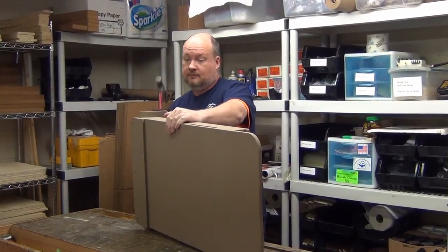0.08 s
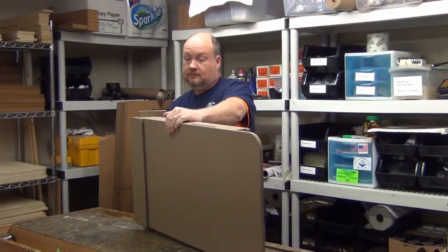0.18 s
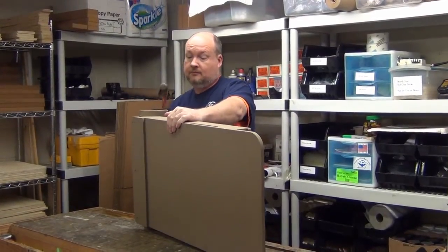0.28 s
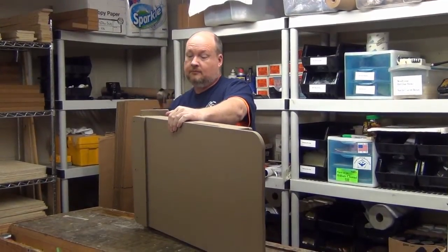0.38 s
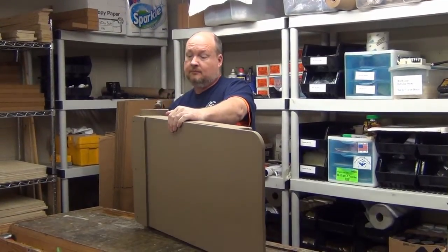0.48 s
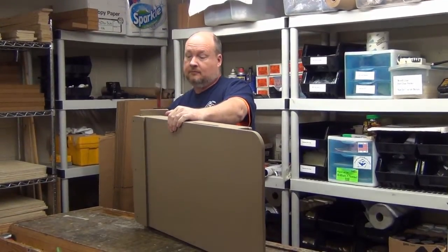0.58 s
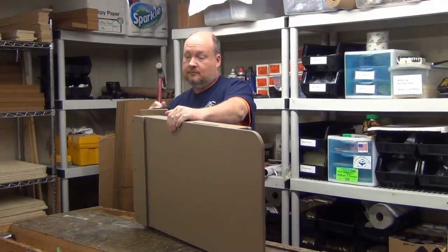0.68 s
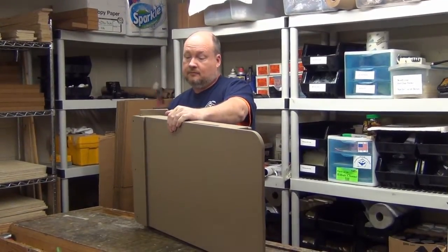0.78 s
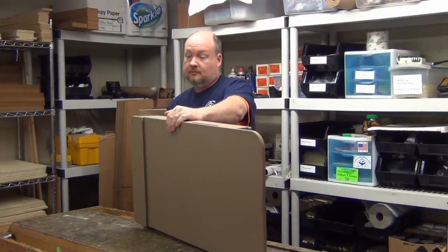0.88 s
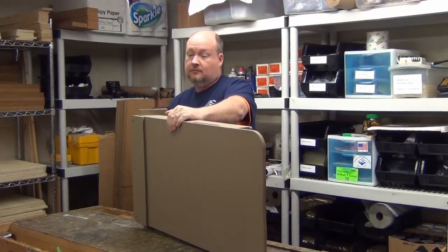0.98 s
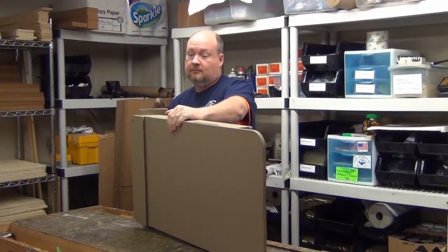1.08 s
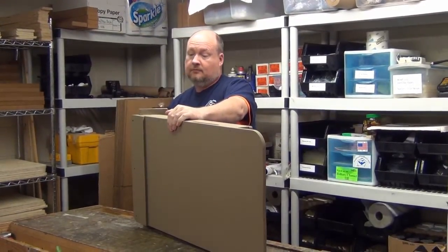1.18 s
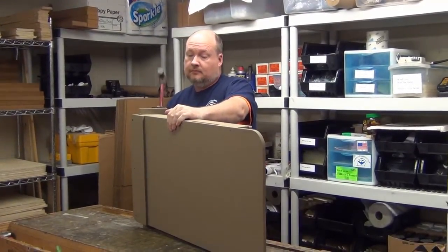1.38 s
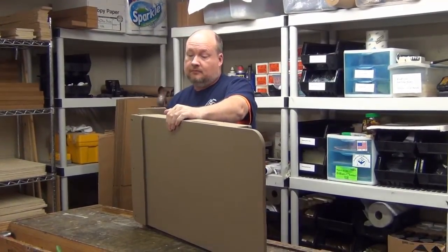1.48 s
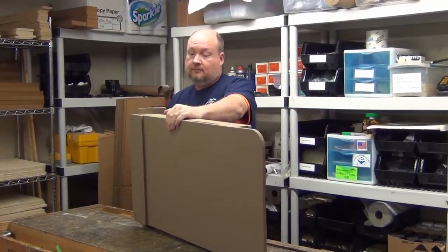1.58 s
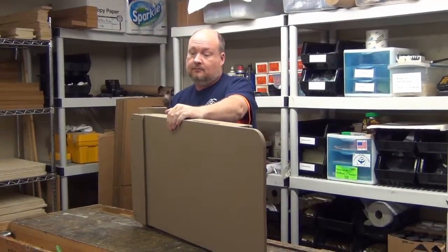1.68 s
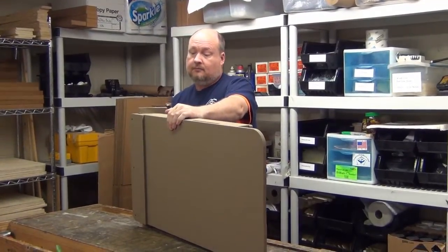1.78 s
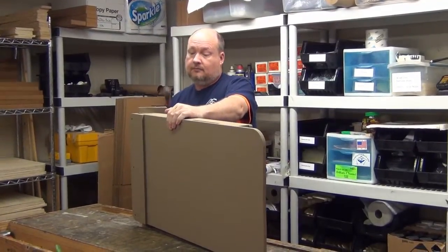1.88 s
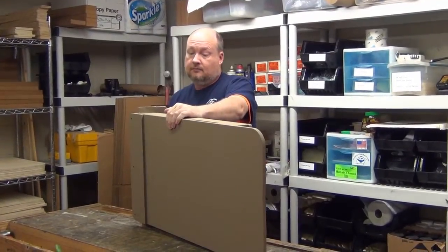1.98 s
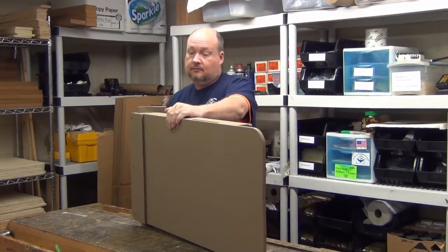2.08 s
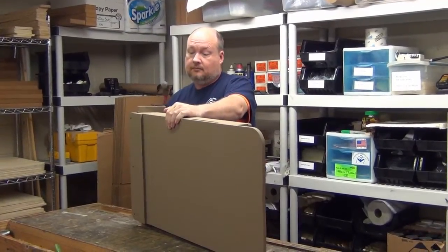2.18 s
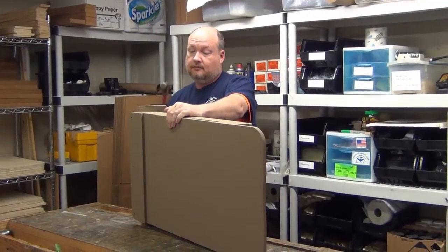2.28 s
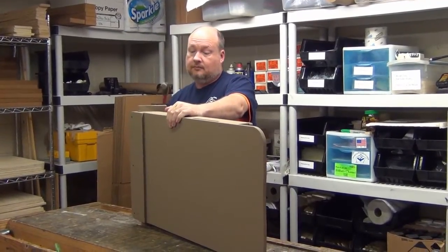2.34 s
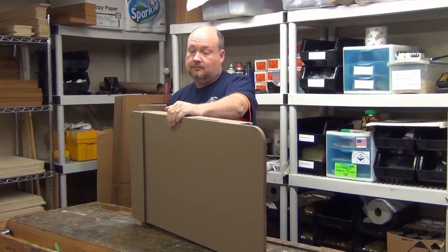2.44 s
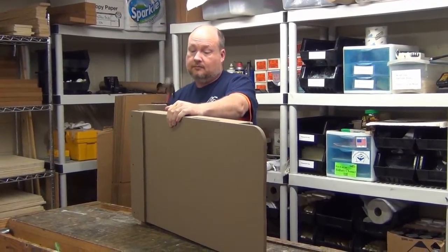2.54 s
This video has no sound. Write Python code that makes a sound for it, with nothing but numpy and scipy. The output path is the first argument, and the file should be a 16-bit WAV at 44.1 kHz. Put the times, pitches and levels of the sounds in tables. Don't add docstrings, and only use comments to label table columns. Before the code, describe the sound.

Hollow wooden box knocks, dull and boomy with a sharp contact crack, at about 0.23, 0.9, 1.54 and 2.17 seconds, the last softest. After each, a loose part hops with a small clatter, clearest near 0.5, 1.2 and 1.8. Short cluttered workshop reverberation, limiter-flattened booms, low room hum. Tiny dry ticks near the microphone; a faint lens motor buzz from 1.25 on.

```python
import sys
import numpy as np
from scipy import signal
from scipy.fft import rfft, irfft, next_fast_len
from scipy.io import wavfile
from scipy.ndimage import uniform_filter1d

SR = 44100
rng = np.random.default_rng(int(sys.argv[2]) if len(sys.argv) > 2 else 0)


def waveform_to_disk(signal):
    frames = np.transpose(np.atleast_2d(signal))
    scaled = np.clip(frames, -1, 1) * 32767
    samples = np.round(scaled).astype(np.int16)
    wavfile.write(sys.argv[1], SR, samples)


def linear_from_db(decibels):
    return 10 ** (np.asarray(decibels, float) / 20)


N = 112455

# (frequency [Hz], likeness [0-1])
BENCH_LIKENESS = [(60, 0.99), (180, 0.75), (550, 0.97), (1650, 0.95), (4970, 0.88), (15000, 0.6)]
AIR_LIKENESS = [(60, 0.64), (180, 0.89), (550, 0.88), (1650, 0.99), (4970, 0.97), (15000, 0.63)]

# (frequency [Hz], density [dB per Hz])
AIR_COLOUR = [(25, -38), (60, -4.5), (100, -17.5), (150, 1), (480, -11.5), (800, -15.5), (9900, -25),
              (16300, -36)]
# (frequency [Hz], width [Hz], level [dB])
HUMS = [(168.6, 12, -3), (250, 33, -5.5), (361.7, 42, -1.5), (478, 20, -10.5), (884, 43, -11),
        (1054, 64, -11.5), (1530, 24, -16.5)]
# (frequency [Hz], level [dB])
WHINE = [(15735, -74)]
AIR_DB, HUM_DB = -56.5, -57.5

# (time [s], frequency [Hz])
MOTOR_PITCH = [(1.25, 1592), (1.53, 1585), (1.85, 1552), (2.14, 1550), (2.5, 1550)]
MOTOR_HARMONICS = [-68, -64.5, -60]
MOTOR_ON_S, MOTOR_STEP_S = 1.2485, 0.013
STEPS_PER_S, STEPS = 29.97, 39

# (time [s], peak level [dB], frequency [Hz], echo level [dB])
TICKS = [(0.0024, -31, 9450, -23), (0.047, -42.5, 9100, -11.5), (0.1041, -38, 9650, -20),
         (0.5374, -33, 9070, -26), (0.5755, -39.5, 9810, -10.5), (1.0842, -26.5, 8200, -23.5),
         (1.4516, -46, 8800, -24), (1.8613, -35, 9100, -22), (1.8826, -31, 9600, -18),
         (1.925, -38, 8980, -17), (1.939, -36, 9900, -17), (2.0164, -35, 9020, -25),
         (2.041, -53, 9190, -22), (2.0547, -46, 10000, -22), (2.0976, -47, 9300, -13),
         (2.4967, -25.5, 9600, -19), (2.5034, -20.5, 9740, -20.5)]
# (frequency [Hz], density [dB per Hz])
TICK_ECHO = [(3000, -16.5), (6500, -9.5), (8200, 2.5), (11000, -15), (16000, -22)]
TICK_DECAY_PER_CYCLE, TICK_LAG_S = 0.87, 0.00078
TICK_ECHO_RISE_S, TICK_ECHO_T60_S = 0.0026, 0.2

# (time [s], level [dB], hiss level [dB], second landing level [dB])
HOPS = [
    (.511, -44.5, 3.5, -1),
    (0.821, -64.5, 10.5, -3),
    (1.182, -42, 2.5, -9),
    (1.348, -60, 3, -9),
    (1.822, -44, -0.5, -4),
    (1.987, -56.5, -1, -16),
    (2.437, -50, 5.5, -7.5),
]
# (frequency [Hz], level [dB], t60 [s])
PART_MODES = [(1047, 6, 0.065), (1550, 2.5, 0.071), (1830, -7, 0.15), (2170, -14, 0.14), (2840, -4, 0.074),
              (4150, -7, 0.09), (6080, -14, 0.063), (7000, 8, 0.072), (7760, 5, 0.074), (8200, 1.5, 0.077),
              (8600, 2.5, 0.076), (10200, -7, .06)]
# (frequency [Hz], level [dB], t60 [s])
SECOND_MODES = [(850, 7, .13), (1490, -2, .1)]
# (frequency [Hz], density [dB per Hz])
HOP_HISS = [(300, -9), (850, 0.5), (1600, -5.5), (4800, -20), (7900, 0), (10500, -22.5), (15000, -34)]
SECOND_LAG_S, HOP_RISE_S, HOP_T60_S = 0.03, 0.007, 0.28

# (time [s], strength [dB], boom [dB], rattle [dB], damping factor)
KNOCKS = [
    (.228, -20.5, 5, -3, 1.07),
    (0.8956, -22, 5.5, -2, 1.016),
    (1.5443, -22, 2, 3.5, 1.064),
    (2.1675, -24, 3.5, 1.5, 1.13),
]
# (frequency [Hz], level [dB], t60 [s])
BOX_MODES = [(122, -11, .3), (143, -9, .33), (166.5, 0.5, .34), (206, -0.5, .39), (243, -10, .27),
             (262.5, -0.5, .36), (302, -3, .33), (333, -11, .25), (392, -13, .3), (436, -17, .3),
             (468, -19, .25), (505, -17, .4), (535, -20, .25), (658, -17, .28)]
# (frequency [Hz], density [dB per Hz])
SHOP_COLOUR = [(70, -10.5), (110, -2), (400, -10), (800, -14.5), (3800, -30), (7900, -26), (10700, -43.5),
               (16300, -68)]
# (frequency [Hz], t60 [s])
SHOP_T60 = [(60, 0.56), (150, 0.32), (500, 0.34), (2000, 0.32), (5000, 0.35), (8000, 0.33), (14000, 0.24)]
# (frequency [Hz], rise [s])
SHOP_RISE = [(60, 0.019), (300, 0.0098), (2000, .003), (12000, 0.0035)]
# (frequency [Hz], density [dB per Hz])
CRACK_COLOUR = [(300, -7), (900, 11), (2500, 8), (5000, -33), (8500, 13.5), (11000, -19), (16000, -36)]
LET_GO_S = 0.12
BOX_DB, BOX_RISE_S, BOX_SPREAD_DB, BOX_LAG_S = -8, 0.00384, 1.46, 0.005433
SHOP_DB, RUMBLE_CUT_HZ, BOOM_HZ, RATTLE_HZ = -0.5, 87, 470, 3240
BOX_LOW_HZ, BOX_HIGH_HZ, BOX_OWNS_DB = 100, 380, -9
CRACK_DB, CRACK_RISE_S, CRACK_DECAY_S = 21, 0.00038, 0.0011
SHUDDER_DB, SHUDDER_HZ, SHUDDER_LEAD_S = -14, 210, 0.005

# (frequency [Hz], left minus right [dB])
LEAN = [(60, -1), (240, 0), (950, -0.5), (3770, -2), (15000, 0)]
CEILING_DB, SQUEEZE, RECOVER_DB_PER_S, GRAB_S = -8, 0.88, 331, 0.0029
SLOW_SHARE, SLOW_S = 0.17, 0.9
EDGE_HZ = 16300


def read(points, hz):
    f, value = np.transpose(points)
    return np.interp(np.log(hz + 1), np.log(f + 1), value)


def evened(x):
    return x / np.sqrt(np.mean(x ** 2) + 1e-20)


def add(mix, s, sound):
    part = mix[:, max(round(s * SR), 0):][:, :sound.shape[-1]]
    part += sound[..., :part.shape[1]]


def noise(size, colour, likeness):
    hz = np.fft.rfftfreq(size, 1 / SR)
    mid, side = rfft(rng.standard_normal((2, size)))
    same = np.clip(read(likeness, hz), 0.05, 0.999)
    width = np.sqrt((1 - same) / (1 + same))
    z = np.array([mid + width * side, mid - width * side]) * linear_from_db(read(colour, hz))
    return hz, z / np.sqrt(np.mean(irfft(z, size) ** 2))


def ring(modes, t, rise_s, spread_db, phase):
    hz, db, t60 = np.transpose(modes)[:, :, None]
    level_luck, phase_luck, side_luck = rng.standard_normal((len(modes), 3)).T[:, :, None]
    gain = linear_from_db(db + spread_db * level_luck - 60 * t / np.clip(t60, 0.01, 1.5))
    gain = gain * (1 - np.exp(-(t / rise_s) ** 2))
    start = phase[:len(modes), None] + 0.49 * phase_luck
    channels = []
    for side in (-1, 1):
        swing = np.sin(2 * np.pi * hz * t + start + side * 0.074 * side_luck)
        channels.append((gain * swing).sum(0))
    return np.array(channels)


def air():
    size = next_fast_len(N)
    hz, z = noise(size, AIR_COLOUR, AIR_LIKENESS)
    flat = noise(size, [(20, 0), (20000, 0)], AIR_LIKENESS)[1]
    bands = sum(linear_from_db(db) / (1 + (2 * (hz - f) / width) ** 4) for f, width, db in HUMS)
    hum = irfft(flat * bands, size)
    t = np.arange(N) / SR
    whine = sum(np.sqrt(2) * linear_from_db(db) * np.sin(2 * np.pi * f * t) for f, db in WHINE)
    return (linear_from_db(AIR_DB) * irfft(z, size) + linear_from_db(HUM_DB) * evened(hum))[:, :N] + whine


def lens_motor():
    t = np.arange(N) / SR
    turns = np.cumsum(np.interp(t, *np.transpose(MOTOR_PITCH))) / SR
    step = (t - MOTOR_ON_S) * STEPS_PER_S
    through = np.clip(step % 1 / STEPS_PER_S / MOTOR_STEP_S, 0, 1)
    gate = np.sin(np.pi * through) ** 0.55 * (step >= 0) * (step < STEPS)
    force = linear_from_db(2.6 * rng.standard_normal((STEPS, 3)))[step.astype(int).clip(0, STEPS - 1)]
    buzz = 0
    for k, db in enumerate(MOTOR_HARMONICS):
        buzz = buzz + linear_from_db(db) * force[:, k] * np.sin(2 * np.pi * (k + 1) * turns)
    return gate * buzz


def tick(s, db, hz, echo_db):
    t = np.arange(8192) / SR
    decay = t * hz * TICK_DECAY_PER_CYCLE
    snap = np.sin(2 * np.pi * hz * t) * decay * np.exp(1 - decay)
    echo = irfft(noise(len(t), TICK_ECHO, AIR_LIKENESS)[1], len(t))
    echo = echo * linear_from_db(echo_db - 60 * t / TICK_ECHO_T60_S) * (1 - np.exp(-t / TICK_ECHO_RISE_S))
    return s + TICK_LAG_S, linear_from_db(db) * (snap + echo)


def hop(phase, s, db, hiss_db, second_db):
    t = np.arange(16384) / SR
    out = ring(PART_MODES, t, HOP_RISE_S, 2.8, phase)
    add(out, SECOND_LAG_S, linear_from_db(second_db) * ring(SECOND_MODES, t, HOP_RISE_S, 1.8, phase))
    hiss = irfft(noise(len(t), HOP_HISS, BENCH_LIKENESS)[1], len(t))
    hiss = hiss * linear_from_db(hiss_db - 60 * t / HOP_T60_S) * (1 - np.exp(-(t / HOP_RISE_S) ** 2))
    return s, linear_from_db(db) * (out + hiss)


def shudder(s, db, *_):
    t = np.arange(0, SHUDDER_LEAD_S + 0.00067, 1 / SR)
    swing = np.sin(2 * np.pi * SHUDDER_HZ * t) * np.hanning(len(t))
    return s - SHUDDER_LEAD_S, linear_from_db(db + SHUDDER_DB) * swing


def shop_answer(t, boom_db, rattle_db, damping):
    hz, z = noise(len(t), SHOP_COLOUR, BENCH_LIKENESS)
    boom = boom_db / (1 + (hz / BOOM_HZ) ** 4)
    rattle = rattle_db / (1 + (RATTLE_HZ / (hz + 1)) ** 4)
    z = z * linear_from_db(boom + rattle) / (1 + (RUMBLE_CUT_HZ / (hz + 1)) ** 4)
    z = z * linear_from_db(BOX_OWNS_DB / (1 + (hz / BOX_HIGH_HZ) ** 6 + (BOX_LOW_HZ / (hz + 1)) ** 6))
    octave = np.log2(hz / 60 + 1e-3).clip(0, 8)
    shop = 0
    for k in range(9):
        mid = 60 * 2 ** k
        fade = linear_from_db(-60 * damping * (t - LET_GO_S) / read(SHOP_T60, mid))
        rise = 1 - np.exp(-t / read(SHOP_RISE, mid))
        band = np.clip(1 - abs(octave - k), 0, 1)
        shop = shop + irfft(z * band, len(t)) * fade * rise
    return linear_from_db(SHOP_DB) * shop


def contact_crack(t):
    burst = irfft(noise(len(t), CRACK_COLOUR, BENCH_LIKENESS)[1], len(t))
    return burst * linear_from_db(CRACK_DB) * np.exp(-t / CRACK_DECAY_S) * (1 - np.exp(-t / CRACK_RISE_S))


def knock(phase, s, db, boom_db, rattle_db, damping):
    t = np.arange(32768) / SR
    out = shop_answer(t, boom_db, rattle_db, damping) + contact_crack(t)
    box = [(f, d + 60 * damping * LET_GO_S / t60, t60 / damping) for f, d, t60 in BOX_MODES]
    add(out, BOX_LAG_S, ring(box, t, BOX_RISE_S, BOX_SPREAD_DB, phase) * linear_from_db(BOX_DB + boom_db))
    return s, linear_from_db(db) * out


def scene():
    mix = air() + lens_motor()
    phase = 2 * np.pi * rng.random(len(BOX_MODES))
    for row in TICKS:
        add(mix, *tick(*row))
    for row in HOPS:
        add(mix, *hop(phase, *row))
    for row in KNOCKS:
        add(mix, *shudder(*row))
        add(mix, *knock(phase, *row))
    return mix


def top_cut(x):
    return signal.sosfilt(signal.butter(12, 16480, fs=SR, output="sos"), x)


def record(dry):
    lean = read(LEAN, np.fft.rfftfreq(N, 1 / SR)) / 2
    x = irfft(rfft(dry) * linear_from_db(np.array([lean, -lean])), N)
    fall = np.arange(N) * RECOVER_DB_PER_S / SR
    peak_db = 20 * np.log10(abs(x).max(0) + 1e-9)
    held_db = np.maximum.accumulate(peak_db + fall) - fall
    over_db = np.maximum(held_db - CEILING_DB, 0)
    fast_db = SQUEEZE * uniform_filter1d(over_db, int(GRAB_S * SR) + 1)
    keep = np.exp(-1 / (SLOW_S * SR))
    slow_db = SLOW_SHARE * signal.lfilter([1 - keep], [1, -keep], over_db)
    x = x / linear_from_db(fast_db + slow_db)
    x = signal.oaconvolve(x, signal.firwin(255, EDGE_HZ, fs=SR)[None], "same")
    return top_cut(x)


dry = scene()
out = record(dry)
waveform_to_disk(out)
```